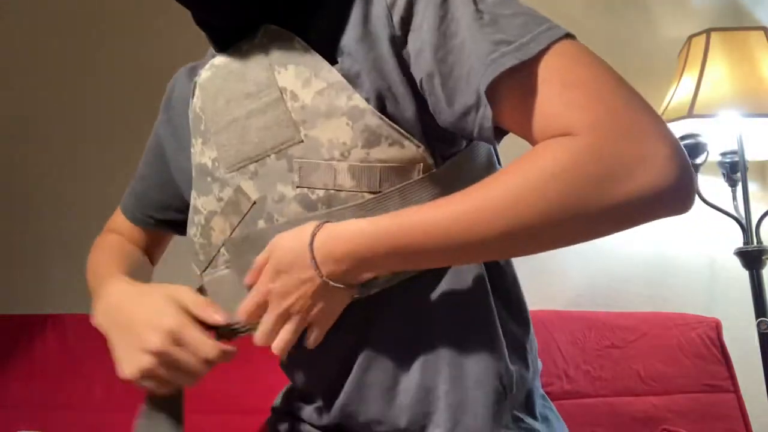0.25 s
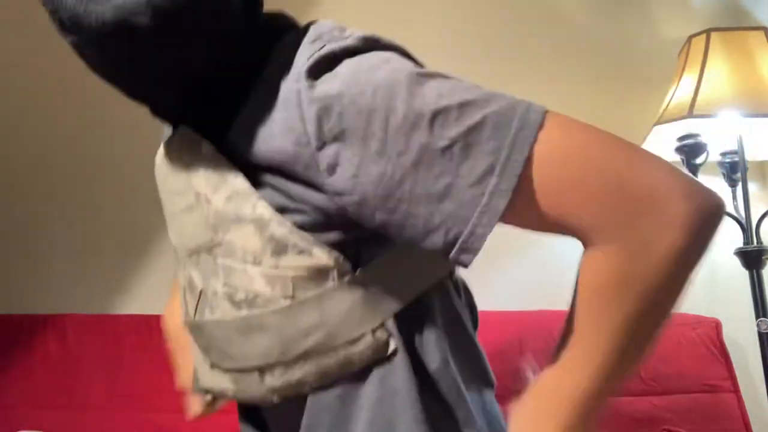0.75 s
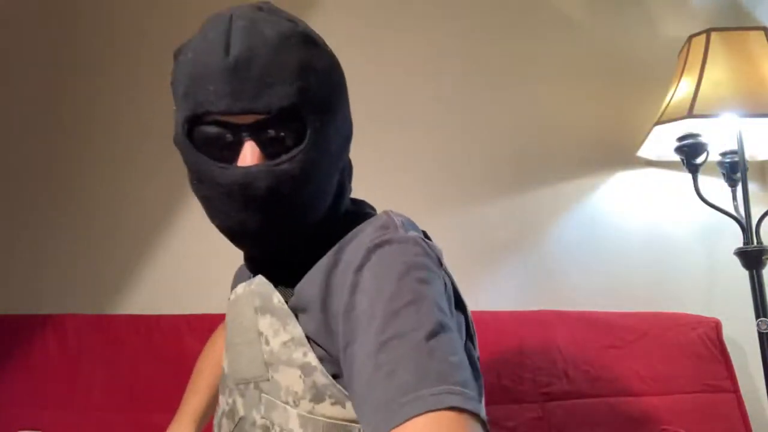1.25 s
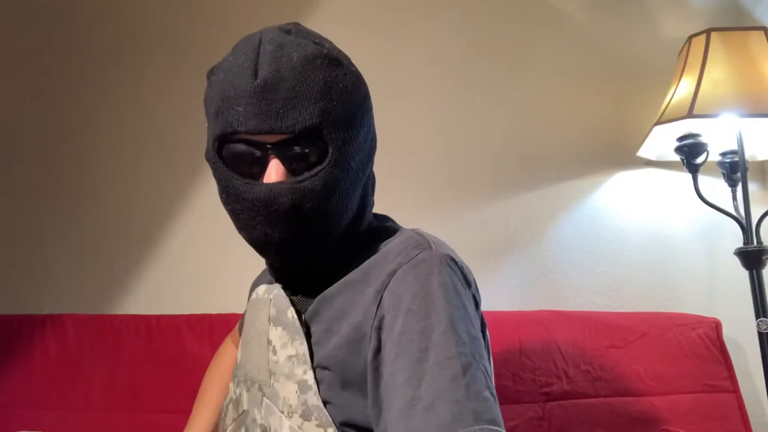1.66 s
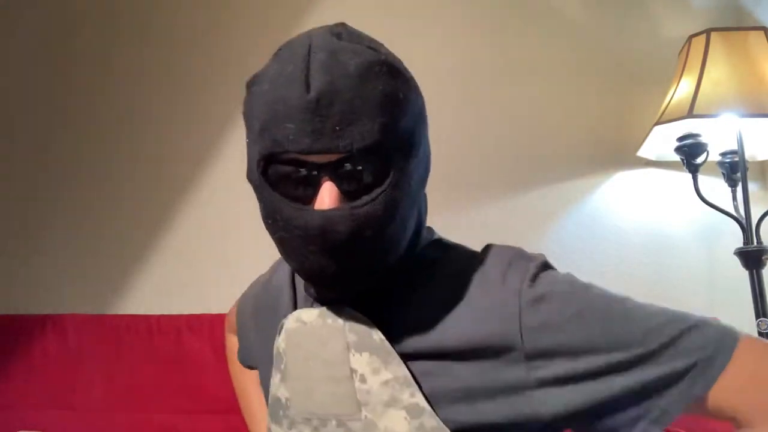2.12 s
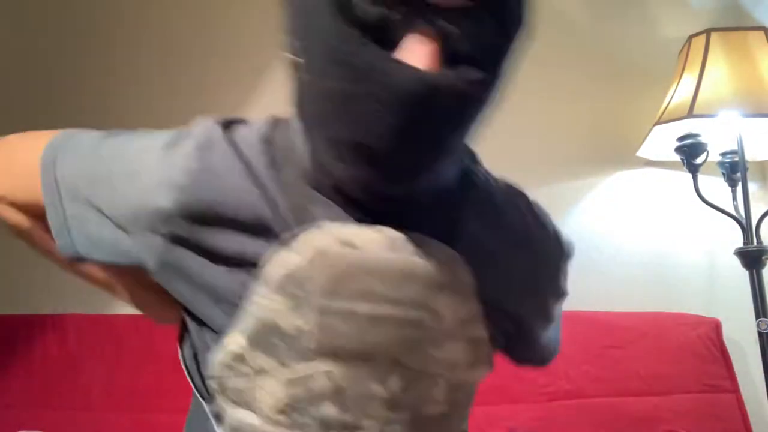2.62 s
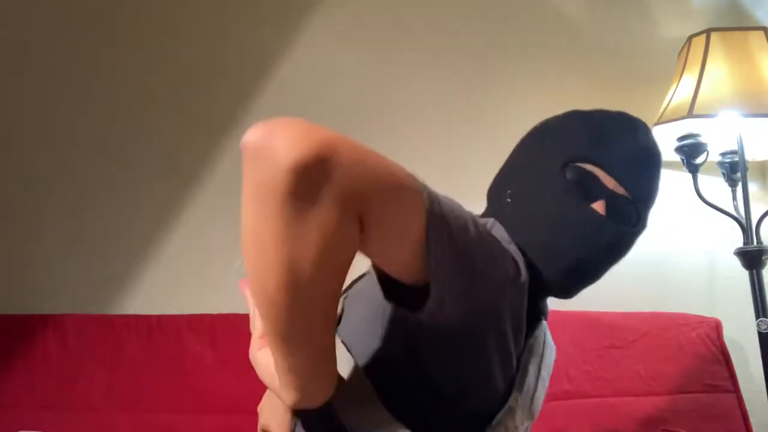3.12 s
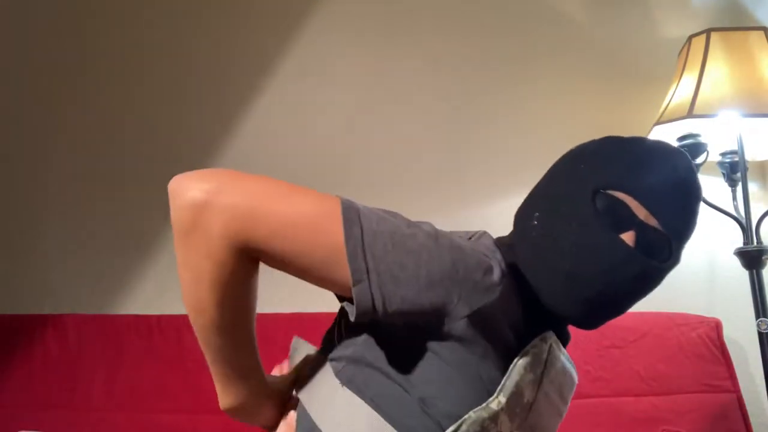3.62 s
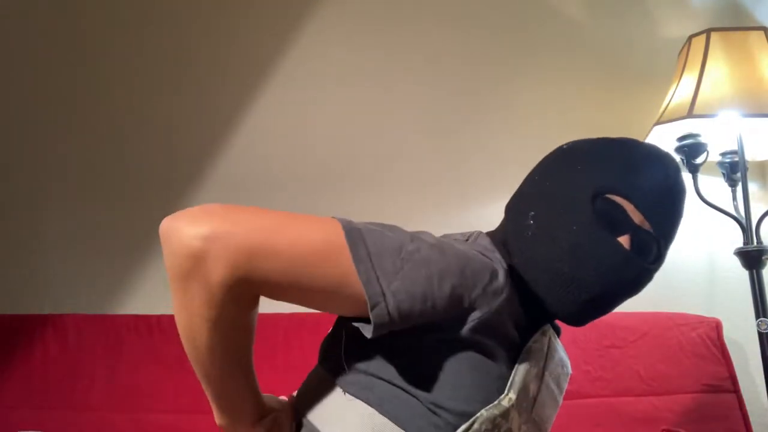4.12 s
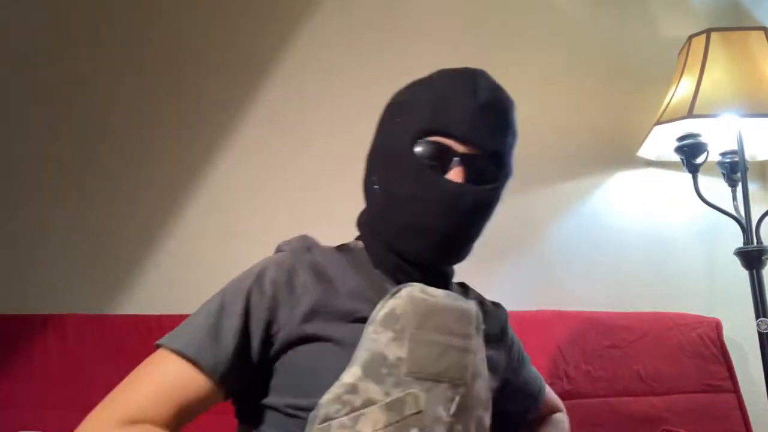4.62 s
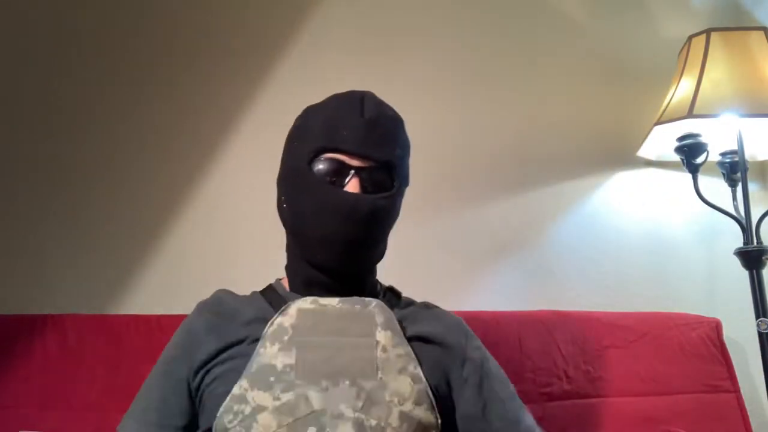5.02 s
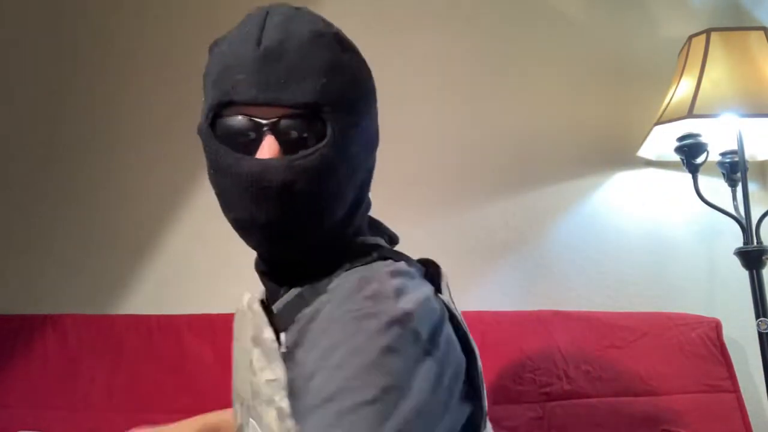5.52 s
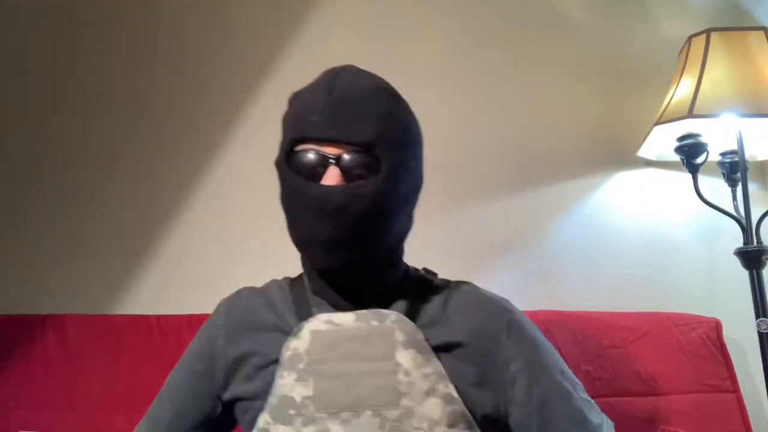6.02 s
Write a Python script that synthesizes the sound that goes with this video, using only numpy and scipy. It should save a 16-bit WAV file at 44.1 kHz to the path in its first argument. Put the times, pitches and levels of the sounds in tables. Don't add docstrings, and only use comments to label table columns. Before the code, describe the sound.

In a small, soft room with a faint steady hum, close small stereo microphones catch a nylon vest being strapped on. From 0 to 0.4 seconds, stiff weave rasps, cloth slides, and tape ticks with light plate knocks. After a quieter moment, a click comes near 0.9, a tiny thin ring chink near 1.0, and a knock. The loudest event is at 1.15 to 1.45: dense hook-and-loop crackle, sharp clicks and a cloth rush, ending in a soft pat. From 1.5 to 2.6 there are only faint rustles and taps. Around 2.7 to 3.7 the other strap scrapes and snaps, with a strong snap and knock at 3.05 and rasps until 3.65. Sparse ticks continue to 4.6. A short double knock and cloth brush land at 4.75. Soft, dull rubs against the sofa swell at 5.25 to 5.6 and 5.8 to 6.25, with low seat rumble.

```python
import sys
import numpy as np
from scipy import signal
from scipy.fft import rfft, irfft, next_fast_len
from scipy.io import wavfile
from scipy.ndimage import uniform_filter1d

SR = 44100
rng = np.random.default_rng(int(sys.argv[2]) if len(sys.argv) > 2 else 0)


def boost(x):
    u = np.asarray(x, float) / 20
    return 10 ** u


def file_out(sig):
    cols = np.atleast_2d(sig).T
    lim = np.clip(cols, -1, 1)
    pcm = np.round(lim * 32767).astype(np.int16)
    wavfile.write(sys.argv[1], SR, pcm)


N = 275914
T = np.arange(N) / SR


def evened(x):
    return x / np.sqrt(np.mean(x ** 2) + 1e-20)


def read(points, hz):
    f, value = np.transpose(points)
    return np.interp(np.log(hz + 1), np.log(f + 1), value)


def coloured(x, points):
    size = next_fast_len(x.shape[-1])
    gain = boost(read(points, np.fft.rfftfreq(size, 1 / SR)))
    return irfft(rfft(x, size) * gain, size)[..., :x.shape[-1]]


def resonate(x, hz, width):
    r = np.exp(-np.pi * width / SR)
    return signal.lfilter([1 - r, 0, r - 1], [1, -2 * r * np.cos(2 * np.pi * hz / SR), r * r], x)


def highpass(x, hz):
    return signal.sosfilt(signal.butter(2, hz, "high", fs=SR, output="sos"), x)


def grains(per_s, spread_db, count=N):
    size = boost(spread_db * np.minimum(rng.exponential(1, count), 4))
    sign = rng.choice([-1., 1.], count)
    return evened(size * sign * (rng.random(count) < per_s / SR))


def flutter(per_s, depth_db):
    drift = uniform_filter1d(rng.standard_normal(N), int(SR / per_s))
    return boost(depth_db * evened(uniform_filter1d(drift, int(SR / per_s / 2))))


def strokes(rows, column):
    drop_db = 20
    power = np.zeros(N)
    for row in rows:
        s, rise, fall = row[0], max(row[1], .003), max(row[2], .003)
        near = slice(max(round((s - 3 * rise) * SR), 0), round((s + 3 * fall) * SR))
        away = np.maximum((s - T[near]) / rise, (T[near] - s) / fall)
        power[near] += boost(2 * (row[column] - drop_db * away))
    return power


def add(mix, s, sound):
    part = mix[round(s * SR):][:len(sound)]
    part += sound[:len(part)]


def alike(a, b, edge_hz):
    size = a.shape[-1]
    same = 1 / (1 + (np.fft.rfftfreq(size, 1 / SR) / edge_hz) ** 2)
    other = irfft(same * rfft(a) + np.sqrt(1 - same ** 2) * rfft(b), size)
    return np.array([a, other])


# (frequency [Hz], level [dB per Hz])
HUM = [(25, -35.5), (60, 1.5), (128, 6), (250, -7.5), (400, -4), (1030, -3.5), (1500, -15.5), (2500, -12),
       (5000, -18), (9000, -16.5), (15500, -21.5)]


def hum():
    size = next_fast_len(N + N % 2) // 2 * 2 + 2
    both = alike(*rng.standard_normal((2, size)), edge_hz=3400)[:, :N]
    return boost(-75.5) * evened(coloured(both, HUM))


# (time [s], level [dB])
SEAT = [(0.0, -71), (0.54, -71.5), (1.1, -74.5), (1.92, -78), (2.05, -70), (2.23, -73.5), (2.67, -67.5),
        (3.07, -77.5), (3.3, -66.5), (3.61, -80.5), (4.53, -77), (5.3, -71), (5.48, -63), (5.72, -77.5),
        (6.0, -67), (6.26, -72.5)]


def rumble():
    low = resonate(resonate(rng.standard_normal(N), 100, 150), 90, 170)
    return boost(np.interp(T, *np.transpose(SEAT))) * evened(low * flutter(23, depth_db=2.0))


# (time of most pressure [s], build-up [s], let-go [s], level [dB])
SLIDES = [(0.02, 0.048, 0.044, -53.5), (0.135, 0.11, .1, -58.5), (0.2, 0.071, 0.11, -59),
          (0.33, 0.21, 0.11, -58), (0.46, 0.027, .15, -72.5), (0.61, 0.033, 0.25, -69.5),
          (0.917, .14, 0.21, -55.5), (1.027, 0.017, 0.081, -51), (1.172, 0.053, 0.028, -55),
          (1.286, 0.021, 0.048, -38), (1.362, .012, 0.015, -36), (1.414, 0.031, 0.036, -36),
          (1.45, 0.018, 0.067, -55), (2.02, 0.24, 0.1, -61.5), (2.188, 0.078, 0.062, -71),
          (2.322, 0.42, 0.45, -64.5), (2.7, 0.36, 0.5, -59), (3.054, 0.078, 0.064, -42.5),
          (3.18, 0.023, 0.092, -50), (3.339, 0.081, 0.052, -55.5), (3.47, 0.12, 0.045, -56),
          (3.652, 0.018, 0.05, -47), (3.938, 0.0072, 0.079, -67), (4.13, 0.0082, 0.12, -64.5),
          (4.312, 0.051, 0.038, -65.5), (4.394, 0.016, 0.095, -72.5), (4.528, 0.011, 0.29, -66),
          (4.753, 0.0084, 0.007, -40.5), (4.79, 0.04, 0.093, -55.5), (4.95, .08, 0.083, -65),
          (5.57, .2, 0.037, -55), (5.65, 0.033, 0.045, -69.5), (5.88, 0.07, .1, -68), (6.2, .1, 0.082, -79)]
# (frequency [Hz], level [dB per Hz])
CLOTH = [(88, -15), (150, -12), (224, -21), (516, -3), (630, -0.5), (691, -2), (1190, 0), (1830, -8),
         (2410, -5), (6000, -20.5), (7800, -52.5), (13200, -120)]


def cloth():
    swish = coloured(grains(per_s=16000, spread_db=2.0), CLOTH) * flutter(57, depth_db=1.85)
    force = np.sqrt(strokes(SLIDES, column=3) + swishes())
    return boost(0.5) * force * evened(swish)


# (time of most pull [s], build-up [s], let-go [s], tape level [dB], weave level [dB])
FRONT_PULLS = [(0.005, 0.032, 0.091, -59.5, -71), (0.135, 0.09, 0.04, -66.5, -56),
               (0.18, .008, 0.15, -56.5, -53), (0.203, 0.07, 0.022, -51.5, -42),
               (0.37, 0.21, 0.017, -64.5, -57), (0.49, 0.1, 0.13, -72.5, -68),
               (0.612, 0.035, 0.054, -63, -63), (0.726, 0.077, 0.022, -71, -72),
               (0.917, 0.1, 0.29, -61.5, -69), (1.027, 0.022, .13, -56, -51),
               (1.172, 0.023, 0.076, -42.5, -44), (1.252, 0.011, 0.25, -39.5, -40.5),
               (1.286, 0.041, 0.047, -29, -24), (1.356, 0.015, 0.051, -30.5, -42),
               (1.399, 0.035, .012, -28, -41), (1.413, 0.038, .028, -24.5, -32),
               (1.45, 0.012, .08, -56, -64), (1.6, 0.11, 0.086, -76, -83), (1.685, 0.008, 0.55, -61.5, -81),
               (2.0, 1, 0.13, -69.5, -62), (2.188, 0.034, .06, -74.5, -54.5),
               (2.322, 0.15, 0.48, -66.5, -66), (2.548, 0.16, 0.25, -65, -59)]
# (time of most pull [s], build-up [s], let-go [s], tape level [dB], weave level [dB])
BACK_PULLS = [(2.699, 0.026, 0.39, -67.5, -60), (2.943, 0.051, 0.18, -57, -70),
              (3.052, 0.24, 0.26, -58.5, -50), (3.19, 0.058, 0.13, -57.5, -55),
              (3.338, 0.11, 0.25, -59.5, -54), (3.474, 0.073, 0.032, -49, -42),
              (3.544, 0.027, 0.063, -51, -47), (3.618, 0.1, 0.019, -48, -45),
              (3.649, 0.032, 0.055, -38.5, -39.5), (3.8, 0.02, 0.068, -62, -80),
              (3.891, 0.12, 0.035, -57, -60), (3.937, 0.0095, .15, -51, -57),
              (4.002, .05, 0.027, -59, -53.5), (4.066, 0.005, 0.14, -64, -59),
              (4.133, 0.015, 0.13, -58.5, -56.5), (4.313, 0.059, 0.0395, -61.5, -59.5),
              (4.53, 0.0098, 0.091, -60, -56), (4.746, .008, 0.033, -61, -44.5),
              (4.819, 0.12, 0.14, -64.5, -59.5), (4.96, 0.107, 0.017, -61.5, -59),
              (5.085, 0.094, 0.092, -74.5, -56), (5.21, 0.099, 0.12, -78, -72),
              (5.46, .15, .15, -74, -56.5), (5.649, .05, 0.048, -88, -73), (6.1, 0.198, .15, -73.5, -57)]
# (frequency [Hz], level [dB per Hz])
TAPE = [(1470, -92), (2500, 0.5), (5170, 2), (7260, 4), (8700, 6), (10700, -0.5), (15100, 0.5),
        (16100, 0.5), (16500, -41)]


def tape():
    rattle = rng.standard_normal((8, 48)) * np.exp(-np.arange(48) / 12)
    pops = sum(signal.oaconvolve(grains(per_s=420, spread_db=3.5), r)[:N] for r in rattle)
    pops = evened(pops * flutter(290, depth_db=5.0))
    swish_db = -12.5
    force = np.sqrt(strokes(FRONT_PULLS + BACK_PULLS, column=3) + boost(2 * swish_db) * swishes())
    tearing = force / (force + boost(-54.0))
    blend = tearing * pops + np.sqrt(1 - tearing ** 2) * rng.standard_normal(N)
    return boost(4.0) * force * evened(coloured(blend, TAPE))


# (resonance [Hz], width [Hz], level [dB])
RASP = [(2300, 1100, 0), (3000, 1300, -3), (4300, 1600, -9)]


def rasp():
    ticking = grains(per_s=4000, spread_db=5.5) * flutter(85, depth_db=1.5)
    force = np.sqrt(strokes(FRONT_PULLS + BACK_PULLS, column=4) + swishes(weave=1.0))
    catching = force / (force + boost(-50.5))
    blend = catching * evened(ticking) + np.sqrt(1 - catching ** 2) * rng.standard_normal(N)
    panels = sum(boost(db) * resonate(blend, hz, width) for hz, width, db in RASP)
    return boost(-2.5) * force * evened(panels)


# (time [s], peak level [dB], ring [Hz])
TICKS = [(0.0099, -35, 3330), (0.02, -29, 3500), (0.1999, -28, 7400), (0.2475, -54, 2550),
         (0.2755, -44, 5000), (0.315, -40, 2800), (0.386, -45, 2600), (0.875, -46, 2600),
         (0.898, -37.5, 9800), (0.9225, -27, 2960), (1.022, -42, 4000), (1.155, -28.5, 3320),
         (1.1608, -24.5, 3380), (1.1712, -24, 3300), (1.186, -27, 3000), (1.2105, -30, 3330),
         (1.238, -26.5, 3130), (1.259, -21, 3000), (1.267, -17, 3000), (1.276, -20, 2900),
         (1.281, -12, 2900), (1.2853, -10, 3000), (1.2882, -14, 2876), (1.296, -13, 3200),
         (1.3085, -14.5, 3140), (1.3222, -19, 3170), (1.3288, -16, 4640), (1.385, -28, 9000),
         (1.3985, -24, 8800), (1.406, -22, 9000), (1.411, -21, 9500), (1.4152, -16.5, 8800),
         (1.4255, -27, 4000), (1.912, -48, 9000), (2.327, -48, 9500), (2.946, -29.5, 2480),
         (2.887, -44, 11100), (3.032, -44, 2000), (3.0537, -30, 2320), (3.1744, -33, 2030),
         (3.0588, -28, 2500), (3.189, -40, 4000), (3.428, -37, 5500), (3.547, -32, 3500),
         (3.586, -37, 3500), (3.611, -32, 3500), (3.637, -35, 3200), (3.939, -49, 5500),
         (4.0636, -34, 3260), (4.146, -36, 5030), (4.1584, -36.5, 4290), (4.5368, -34, 4230),
         (4.586, -41.5, 8770), (4.7433, -36, 2980), (4.7522, -27, 1800), (5.255, -48.5, 2060)]


def ticks():
    out = np.zeros(N)
    for s, db, hz in TICKS:
        click = rng.standard_normal(400) * np.exp(-np.arange(400) / 9)
        sound = resonate(click, hz, 0.25 * hz) + 0.2 * resonate(click, 6400, 10000)
        add(out, s, boost(db + 3) * sound / abs(sound).max())
    return out


# (time [s], peak level [dB], ring [Hz], t60 [s])
KNOCKS = [(0.13, -43.5, 1090, .06), (0.162, -40.5, 1250, 0.033), (0.201, -37, 1050, .04),
          (0.242, -41, 1300, .04), (0.272, -39.5, 1080, 0.028), (0.287, -43.5, 940, 0.039),
          (0.316, -52, 1080, .03), (0.348, -44, 1110, 0.031), (0.875, -38.5, 820, 0.021),
          (1.024, -28, 1230, 0.077), (1.045, -46, 1250, 0.045), (1.171, -29.5, 1290, 0.027),
          (1.185, -33, 1250, 0.045), (1.273, -22.5, 1140, 0.1), (1.697, -41.5, 1040, 0.044),
          (1.722, -42.5, 1330, 0.029), (1.811, -44.5, 1190, 0.27), (2.027, -43, 410, 0.066),
          (2.028, -42.5, 790, .04), (2.135, -54, 456, 0.07), (2.534, -48, 1190, 0.056),
          (2.663, -40, 338, 0.13), (2.699, -39, 880, 0.079), (2.793, -51, 320, 0.083),
          (2.877, -45, 1040, .05), (3.057, -24, 1380, 0.047), (3.185, -37.5, 406, 0.089),
          (3.321, -37, 448, 0.026), (4.396, -47.5, 890, 0.035), (4.533, -66, 575, 0.045),
          (4.741, -27.5, 750, 0.031), (4.751, -23.5, 910, 0.019), (4.757, -40, 298, 0.038),
          (5.041, -54.5, 706, .05), (5.256, -48, 713, 0.04)]


def knocks():
    out, t = np.zeros(N), np.arange(6000) / SR
    rise_s = .004
    for s, db, hz, t60 in KNOCKS:
        puff = rng.standard_normal(len(t)) * np.minimum(t / rise_s, 1) * boost(-60 * t / max(t60, .02))
        sound = resonate(resonate(puff, hz, 0.5 * hz), hz, 0.8 * hz)
        add(out, s, boost(db - 6.5) * sound / abs(sound).max())
    return out


# (time [s], peak level [dB], ring [Hz], treble level [dB], body level [dB])
SNAPS = [(0.178, -21.5, 7400, -31, -34), (0.2017, -18, 7500, -24, -23), (0.2443, -33, 2240, -11, -31),
         (0.612, -35.5, 2170, -11, -27), (0.9222, -50.5, 1870, -16, 20), (1.0293, -58, 1590, -18, 17),
         (1.0507, -28.5, 3570, -2, -19), (1.0944, -47, 4360, 14.5, 13.5),
         (1.2445, -31, 3090, -3, -14), (1.2526, -22, 2930, 3, -36), (1.3514, -29, 3900, 11.5, -10),
         (2.1902, -35.5, 1630, -25, -8),
         (2.7368, -32, 3630, -13, -20), (2.9884, -25, 2350, -25, -20), (3.004, -25, 3100, 4, -26),
              (3.031, -25, 1900, -22, -13), (3.0585, -12, 2390, -39, -48), (3.174, -27, 2070, -22, -16),
              (3.3243, -32.5, 1910, -4, 0), (3.467, -27.5, 2170, -23, -11.5), (3.5262, -30.5, 3280, 3, -14),
              (3.583, -28, 4300, -1, -19), (3.938, -43, 5730, 13, -36), (4.007, -36.5, 3060, -6, -6.5),
              (4.0636, -42, 2360, -14, -6.5), (4.1345, -36, 3500, -10, -10), (4.5313, -38, 4380, -23.5, 6),
              (4.7422, -42, 2100, -17, 20)]


def snaps():
    out, t = np.zeros(N), np.arange(5000) / SR
    t60_s = 0.045
    for s, db, hz, treble_db, body_db in SNAPS:
        pops = grains(per_s=4400, spread_db=3.0, count=len(t))
        pops[0] = 0.63
        pops = pops * boost(-60 * t / t60_s)
        ring = resonate(pops, hz, 0.33 * hz)
        treble = resonate(pops, 8600, 13000)
        body = resonate(pops, 620, 570)
        burst = 0.72 * ring / abs(ring).max()
        burst += boost(treble_db) * treble / abs(treble).max()
        burst += boost(body_db) * body / abs(body).max()
        add(out, s, boost(db - 5.5) * burst)
    return out


# (time [s], level [dB], ring [Hz], t60 [s])
BUCKLE = [
    (.978, -37.5, 12320, 0.12),
]


def buckle():
    out, t = np.zeros(N), np.arange(4000) / SR
    for s, db, hz, t60 in BUCKLE:
        ring = evened(resonate(resonate(rng.standard_normal(len(t)), hz, 300), hz, 400))
        add(out, s, boost(db - 60 * t / min(t60, .1)) * (1 - np.exp(-t / .008)) * ring)
    return out


# (time [s], peak level [dB], pitch [Hz], t60 [s])
PATS = [(1.42, -31, 174.7, 0.054), (2.026, -48, 172, 0.072), (2.662, -49.5, 186, 0.13),
        (2.684, -43, 131, 0.053), (2.697, -51.5, 149, 0.081), (2.795, -43.5, 194, 0.061),
        (2.818, -54.5, 127, 0.096), (3.032, -40.5, 287, 0.045), (3.068, -46, 195, 0.089),
        (3.181, -46.5, 250, 0.065), (3.332, -41.5, 194.6, 0.1), (3.343, -56.5, 205.4, 0.17),
        (3.359, -47, 200, 0.047), (3.696, -50, 181, 0.049), (4.535, -52, 188, 0.061),
        (4.759, -41, 117.6, 0.052)]


def pats():
    out, t = np.zeros(N), np.arange(9000) / SR
    for s, db, hz, t60 in PATS:
        shape = (1 - np.exp(-t / 0.0083)) * boost(-60 * t / max(t60, .03))
        wobble = 1 + 0.95 * evened(resonate(rng.standard_normal(len(t)), 43, 66))
        modes = np.sin(2 * np.pi * hz * t) + 0.34 * np.sin(2 * np.pi * 1.9 * hz * t)
        add(out, s, boost(db + 5.5) * shape * wobble * modes)
    return out


# (start time [s], length [s], level [dB], weave against it [dB], lateness of the peak [exponent])
SWISHES = [
    (5.02, 0.14, -64.5, -6, 1.02),
    (5.239, 0.38, -52.5, -6.5, 1.24),
    (5.799, 0.47, -57, -6, 1.69),
]


def swishes(weave=0):
    roundness, hold = 1.12, 1.62
    power = np.zeros(N)
    for s, length, db, weave_db, late in SWISHES:
        progress = ((T - s) / length).clip(0, 1) ** late
        arch = np.tanh(hold * abs(np.sin(np.pi * progress)))
        power += boost(2 * (db + weave * weave_db)) * arch ** (2 * roundness)
    return power


# (frequency [Hz], t60 [s])
ROOM = [(100, 0.053), (1000, 0.089), (5000, 0.1), (15000, 0.084)]
# (frequency [Hz], level [dB])
ROOM_DB = [(100, 0.5), (1000, -1.5), (3000, 1), (7000, 1.5), (15000, 0)]


def tail():
    taps = alike(*rng.standard_normal((2, 8192)), edge_hz=300)
    hz, t, z = signal.stft(taps, SR, nperseg=256)
    decay = signal.istft(z * boost(-60 * t / read(ROOM, hz)[:, None]), SR, nperseg=256)[1]
    decay = decay * (1 + 2.2 * np.exp(-np.arange(decay.shape[1]) / SR / .0025))
    decay[:, :12] = 0
    left_right_db = np.array([[-5.5], [-2.5]])
    return coloured(decay / np.linalg.norm(decay[0]), ROOM_DB) * boost(left_right_db)


# (frequency [Hz], level [dB])
SHADOW = [(300, 4), (1000, 1), (2500, -3), (6000, -14.5), (14000, -9)]


def room(x):
    out = np.array([x, coloured(np.roll(x, 3), SHADOW)])
    for k in range(6):
        turns = T * (7 + 4 * (k // 3)) + k / 3
        share = np.sqrt(2 / 6) * np.cos(2 * np.pi * turns)
        out = out + signal.fftconvolve((share * x)[None], tail(), axes=1)[:, :N]
    return out


def scene():
    crackle = highpass(rasp() + snaps() + ticks(), 400)
    vest = cloth() + tape() + crackle + rumble() + knocks() + pats() + buckle()
    return boost(-1.0) * room(highpass(vest, 80)) + hum()


# (frequency [Hz], left minus right [dB])
LEFT_MORE = [(200, 4), (600, 2.5), (1300, 2.5), (2500, 3), (5000, 1.5), (14000, 0)]


def band_limit(x):
    return signal.sosfilt(signal.butter(12, 15850, fs=SR, output="sos"), x)


def record(dry):
    left = coloured(dry[0], [(hz, db / 2) for hz, db in LEFT_MORE])
    right = coloured(dry[1], [(hz, -db / 2) for hz, db in LEFT_MORE])
    pair = highpass(np.array([left, right]), 85)
    pair = signal.oaconvolve(pair, signal.firwin(1023, 15800, fs=SR)[None], "same")
    return band_limit(pair)


dry = scene()
out = record(dry)
file_out(out)
```